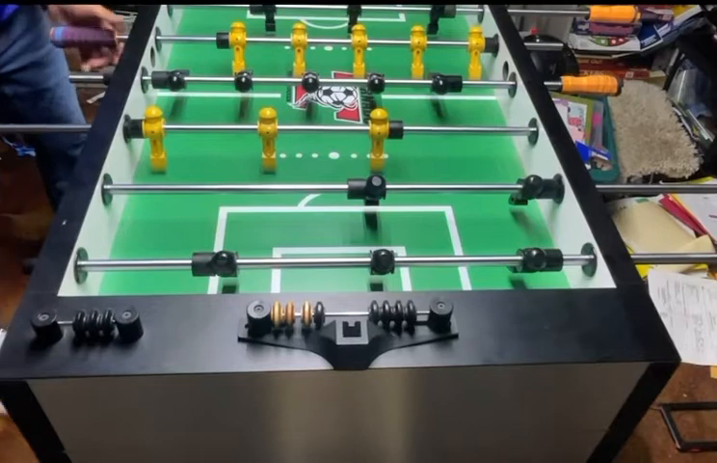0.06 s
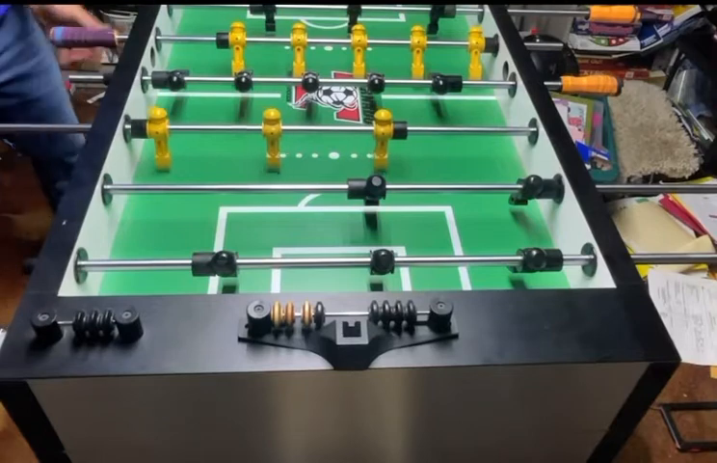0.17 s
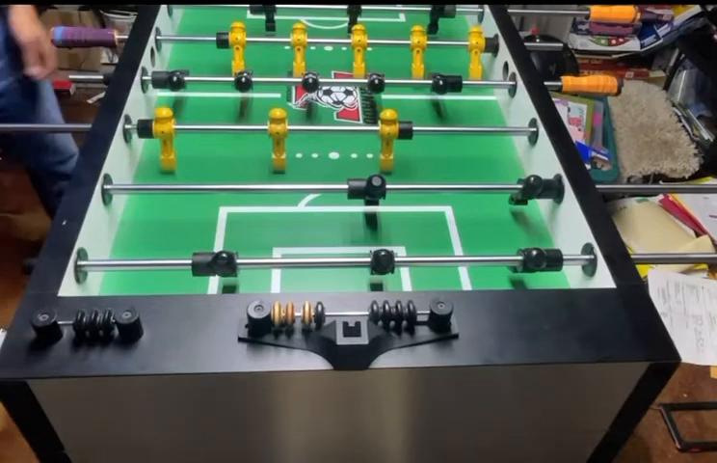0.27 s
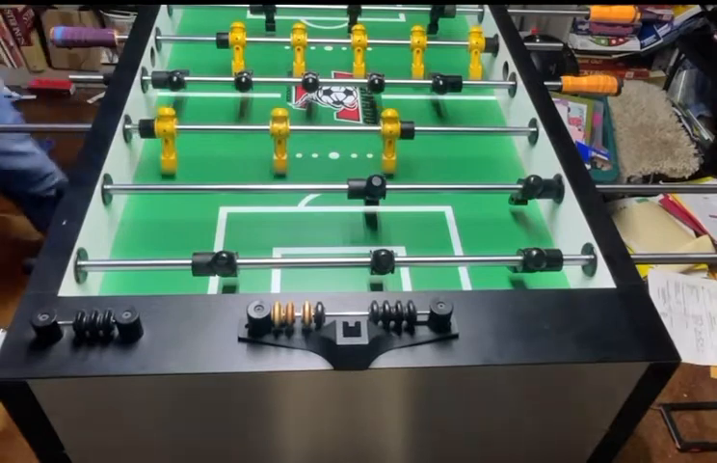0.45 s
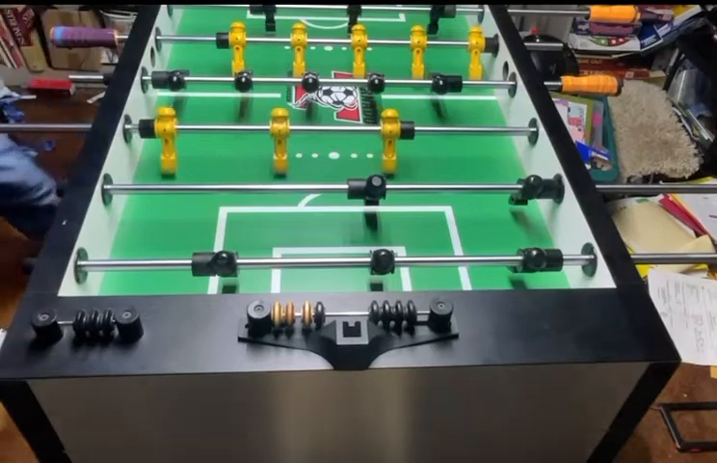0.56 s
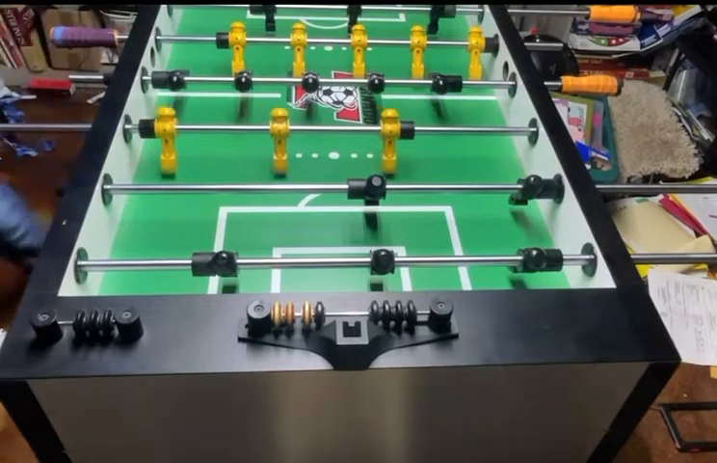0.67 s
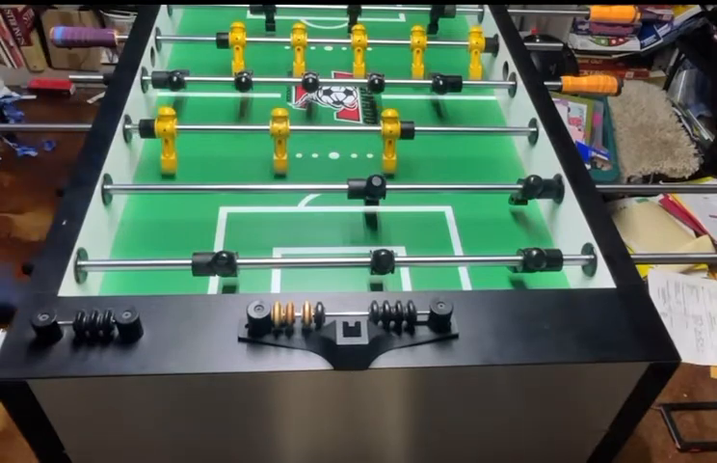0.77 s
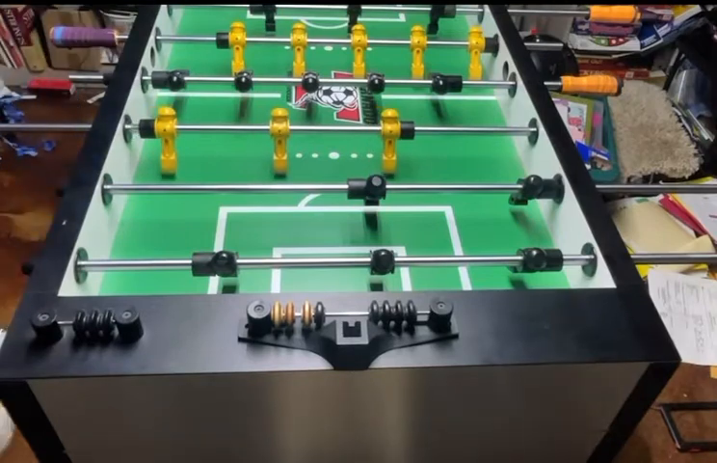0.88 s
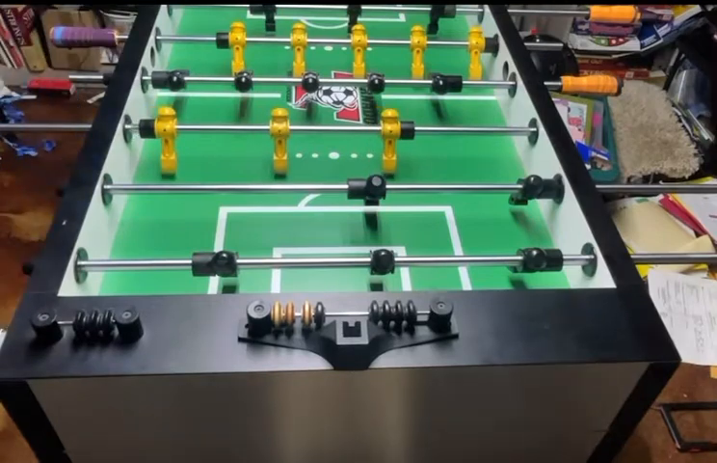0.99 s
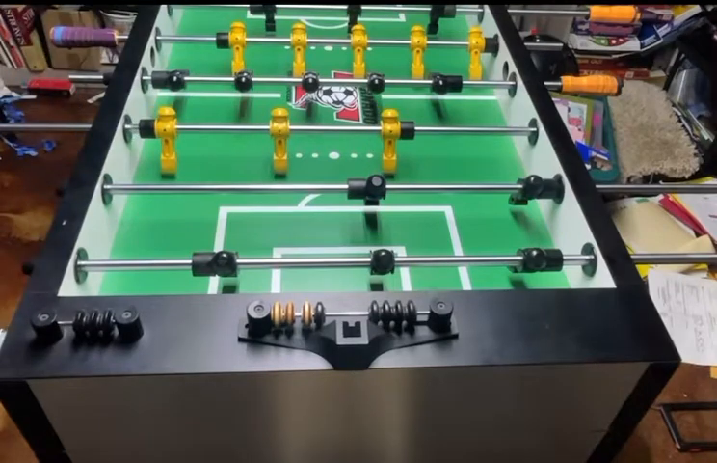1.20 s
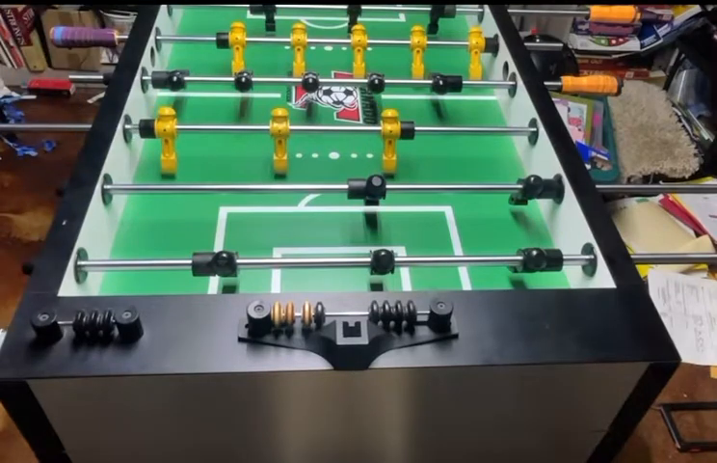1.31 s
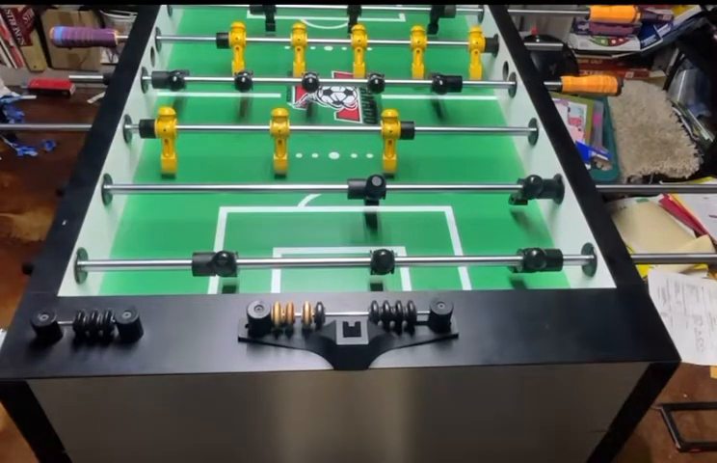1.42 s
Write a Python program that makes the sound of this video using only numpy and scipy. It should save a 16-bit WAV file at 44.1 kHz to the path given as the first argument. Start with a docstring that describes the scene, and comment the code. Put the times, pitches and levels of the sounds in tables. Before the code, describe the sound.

A foosball knocks sharply against the table's wooden wall, followed by duller rod knocks.

```python
"""A foosball is nudged and slammed into the table's wooden cabinet, in a small, cluttered room.
Each hit sends out a short pulse and sets the wood, the steel rods and a plastic figure ringing.
Duller knocks of rods and bumpers follow, and low thumps pass through the table as rods are shoved.
Underneath, the ball rumbles as it rolls, and the rods hiss and squeak faintly in their bearings."""
import sys
import numpy as np
from scipy import signal
from scipy.fft import rfft, irfft, next_fast_len
from scipy.io import wavfile
from scipy.ndimage import uniform_filter1d

SR = 44100
rng = np.random.default_rng(int(sys.argv[2]) if len(sys.argv) > 2 else 0)


def wav_out(sig):
    """Save sig, one row per channel (or a flat mono array), as 16-bit PCM at SR to the path in sys.argv[1]."""
    wavfile.write(sys.argv[1], SR, np.round(np.clip(np.atleast_2d(sig).T, -1, 1) * 32767).astype(np.int16))


N = 63945
TIME = np.arange(N) / SR

# Levels are relative. A mode is a tone at which a part rings; t60 is the time to fade by 60 dB.
# The hits, plus the rods' ring swelling back as an echo at 0.453 s:
# t/s, level/dB, contact cut-off f/Hz, bass/dB, plastic click/dB, wall ring/dB, rod ring/dB
EVENTS = [(0.1736, -25, 487, -23, -48.5, -62, -67), (0.1952, -25.5, 2030, -29.5, -56, -54, -46),
          (0.2075, -22, 1850, -10, -49, -60, -46), (0.2185, -25.5, 1470, -9, -31, -8.5, -49),
          (0.2265, -28, 1390, 4, -35, -24.5, -67), (0.4236, -24.5, 806, -24, -48.5, -36, -28.5),
          (0.4533, -36.5, 810, 1, -53, -52, -33.5), (0.507, -38.5, 1544, -3, -57.5, -54, -51.5),
          (0.584, -46.5, 1300, -18, -67, -66, -58), (0.6250, -30.5, 396, -17, -90, -74, -78),
          (0.6550, -39.5, 368, -8.5, -83, -57, -77), (0.9931, -48.5, 554, -11, -96, -54, -85),
          (1.0010, -41.5, 420, -18, -90, -64, -72), (1.0322, -33.5, 650, -16.5, -93, -35, -53.5),
          (1.1130, -53.5, 375, -3, -87, -44.5, -73)]
# Modes of each part: f/Hz, level/dB, t60/s (capped at LONGEST_RING_S)
WALL_MODES = [(331.3, -21, 0.15), (673, -19.5, .34), (698, -13.5, .42), (759.5, 0, .13), (767.6, -15, .48),
              (731, -18, 0.4), (825.5, -10, 0.12), (1003, -31.5, .33)]  # the cabinet wall that the ball strikes
PANEL_MODES = [(143, -14.5, 0.38), (172, -7, 0.22), (265.3, -12.5, 1), (337, -11, .35), (376.2, -11, 0.15),
               (406.4, -9, 0.17), (439.8, -6.5, 0.067), (559.7, -9, 0.16), (1130, -13.5, 0.086),
               (1199, -14.5, 0.083), (1470, -22, .25)]  # the cabinet's panels
ROD_MODES = [(817.6, -3, .25), (880, -7.5, 0.45), (901, -1.5, .18), (1565, -4, 0.094), (1527, -10, 0.43),
             (1638.3, -2, 0.32)]  # the steel rods
FIGURE_MODES = [(2310, -5.5, 0.45), (2753, -10, 0.073), (3686, -12, 0.66), (5146, -15.5, .18),
                (6406, -14, 0.18), (6835, -14.5, .15)]  # the plastic figure
# Tone colour of each noisy sound, per half octave: f/Hz, level/dB
WOOD_SPECTRUM = [(30, -31.5), (80, -40), (110, -25), (160, -9.5), (220, -6.5), (280, -1), (400, -1.5),
                 (560, 0), (800, 2.5), (1200, -5), (1700, -2.5), (2500, -3), (6000, -2)]  # the cabinet's crowded modes
CLICK_SPECTRUM = [(800, -18.5), (1500, -7.5), (2800, 0), (4500, -5), (7000, -2.5), (10000, -6.5),
                  (13000, -11.5), (16000, -21)]  # the plastic click
ROLL_SPECTRUM = [(30, -18.5), (60, -19.5), (150, -21.5), (270, -3.5), (400, -2), (750, -4), (1200, -14.5),
                 (2200, -27), (5000, -41), (14000, -58.5)]  # the rolling ball
SLIDE_SPECTRUM = [(300, -8), (1000, -6), (2000, -3), (3500, -4), (5500, 0.5), (9000, -9), (12000, -10),
                  (16000, -26)]  # the sliding rods
QUIET_SPECTRUM = [(30, -91.5), (90, -78.5), (140, -87), (220, -77), (450, -81), (1000, -89), (3000, -83),
                  (8000, -93), (15000, -108)]  # the quiet room
# Loudness over time: t/s, level/dB
ROLL_LEVEL = [(0, -50), (.12, -47), (.2, -53.5), (.4, -51), (.55, -66.5), (.62, -40), (.68, -48.5),
              (.8, -75), (1.45, -88.5)]  # the rolling ball
SLIDE_LEVEL = [(0, -72.5), (.11, -97), (.3, -63), (.6, -78), (.85, -96.5), (1.05, -82), (1.3, -77.5),
               (1.45, -80)]  # the sliding rods
# Shoves that sway the table: t/s, level/dB, swell time/s
THUMPS = [(0.03, -50.5, .07), (0.427, -58, 0.016), (0.506, -42, 0.028), (0.594, -45, 0.011),
          (0.664, -62, 0.053), (1.01, -61, .025), (1.138, -63.5, .03)]
# The whistle of a sliding rod: t/s, f/Hz, level/dB
SQUEAK = [(1.26, 9230, -100), (1.31, 9210, -75), (1.39, 8680, -76.5), (1.45, 8550, -83)]
# Echoes of the pulses from the room's side wall and ceiling: delay/s, level/dB
PULSE_ECHOES = [(.0058, 0.5), (0.03, -3.5)]
# Echoes of the ringing: left delay/s, left level/dB, right delay/s, right level/dB
RING_ECHOES = [(.009, -14, .0135, -10), (.029, -10, .037, -10.5)]
# How long sound lingers in the room: f/Hz, t60/s
ROOM_T60 = [(60, 0.18), (250, 0.46), (700, 0.44), (2000, .45), (6000, 0.29), (14000, .28)]
# How alike the noise is at both ears: f/Hz, correlation (1 = the same)
EAR_LIKENESS = [(60, 0.32), (250, 0.36), (500, 0.2), (1000, .2), (4000, 0.11), (12000, .1)]
# Which way the noise leans: f/Hz, left minus right level/dB
EAR_BALANCE = [(40, 0), (125, 5), (300, 2.5), (700, 7.5), (1200, 6), (2500, 4.5), (5000, 8.5),
               (12000, -1.5)]

CONTACT_SLOPE, BASS_HZ = 3.1, 218  # how steeply an event loses treble; where its bass ends
PULSE_DB, PULSE_LOW_HZ, PULSE_TOP_HZ = 1.5, 407, 1920
RING_LOW_HZ, RING_TOP_HZ, LONGEST_RING_S = 130, 2170, .5
PULSE_PAN_DB, WALL_PAN_DB, ROD_PAN_DB, FIGURE_PAN_DB, PANEL_PAN_DB = 3, 6, 7.5, 7, -1
WALL_LAG_S = 0.00024  # the wall's ring reaches the left ear first
WOOD_T60_S, CLICK_T60_S = 0.12, 0.075
CLICK_TOP_RATIO = 6.6  # click cut-off divided by contact cut-off
ATTACK_S, SWELL_CYCLES = .0015, 0.75  # rise of the noisy tails
WOOD_ROOM_DB, CLICK_ROOM_DB, ROOM_BUILD_S = -9, -8.5, 0.0088
THUMP_HZ, SQUEAK_WIDTH_HZ = 89, 160
MODE_LIFT_DB, MODE_WIDTH_HZ = 1.5, 24  # the strong modes stand out of the noise
RIPPLE_DB, RIPPLE_WIDTH_HZ, RIPPLE_FROM_HZ = 3, 60, 470  # unevenness of the small resonances
PEAK_LIMIT, CUTOFF_HZ = .9, 15700


def air_pulses():
    """Each event is one short pulse, wider when soft, which returns from wall and ceiling."""
    out = np.zeros(N)
    for s, db, contact_hz, *_ in EVENTS:
        pulse = butter_twice(signal.unit_impulse(SR // 50), contact_hz, "low")
        pulse = butter(pulse, PULSE_LOW_HZ, "high")
        start = int(s * SR)
        out[start:start + len(pulse)] += from_db(db + PULSE_DB) * pulse / np.abs(pulse).max()
    out = cut_bass(butter(out, PULSE_TOP_HZ, "low"))
    echoes = sum(from_db(db) * delayed(out, lag_s) for lag_s, db in PULSE_ECHOES)
    return pan(PULSE_PAN_DB) * (out + echoes)


def event_strength(hz):
    """Strength of every event at one frequency: soft ones have less treble, heavy ones more bass."""
    _, db, contact_hz, bass_db, *_ = np.transpose(EVENTS)
    strength = from_db(db + bass_db / (1 + (hz / BASS_HZ) ** 4))
    return strength / np.sqrt(1 + (hz / contact_hz) ** (2 * CONTACT_SLOPE))


def event_spikes(heights):
    """One single-sample spike at the moment of each event."""
    out = np.zeros(N) + 1e-18
    out[(np.array(EVENTS)[:, 0] * SR).astype(int)] += heights
    return out


def ringing_parts():
    """The cabinet's wall and panels, the rods and the figure ring with their own tones."""
    click_gain, wall_gain, rod_gain = from_db(np.transpose(EVENTS)[-3:])
    wall = ring(WALL_MODES, lambda hz: wall_gain)
    wall = pan(WALL_PAN_DB) * np.array([wall, delayed(wall, WALL_LAG_S)])
    panels = pan(PANEL_PAN_DB) * ring(PANEL_MODES, event_strength)
    rods = pan(ROD_PAN_DB) * ring(ROD_MODES, lambda hz: rod_gain)
    figure = pan(FIGURE_PAN_DB) * ring(FIGURE_MODES, lambda hz: click_gain)
    return cut_bass(butter_twice(wall + rods + panels, RING_TOP_HZ, "low")) + figure


def ring(modes, gains_at):
    """Every event starts a fading tone in each mode, as strongly as gains_at(hz) says."""
    out = 0
    for hz, db, t60 in modes:
        decay = from_db(-60 / (min(t60, LONGEST_RING_S) * SR))
        angle = 2 * np.pi * hz / SR
        spikes = event_spikes(from_db(db) * gains_at(hz))
        out += signal.lfilter([0, np.sin(angle)], [1, -2 * decay * np.cos(angle), decay ** 2], spikes)
    return out


def cut_bass(x):
    """Little of the ringing and the pulses sounds below about 130 Hz."""
    return butter_twice(x, RING_LOW_HZ, "high")


def with_echoes(x):
    """The ringing reaches each ear again from nearby surfaces."""
    return x + sum(np.array([from_db(left_db) * delayed(x[0], left_s),
                             from_db(right_db) * delayed(x[1], right_s)])
                   for left_s, left_db, right_s, right_db in RING_ECHOES)


def event_tails(hz):
    """Loudness in one band as wood and plastic die away after each event and linger in the room."""
    _, _, contact_hz, _, click_db, *_ = np.transpose(EVENTS)
    wood = event_spikes((event_strength(hz) * from_db(at_hz(WOOD_SPECTRUM, hz))) ** 2)
    dulling = 1 + (hz / (CLICK_TOP_RATIO * contact_hz)) ** 4
    click = event_spikes(from_db(click_db + at_hz(CLICK_SPECTRUM, hz)) ** 2 / dulling)
    into_room = from_db(WOOD_ROOM_DB) ** 2 * wood + from_db(CLICK_ROOM_DB) ** 2 * click
    room = smooth(fading(into_room, at_hz(ROOM_T60, hz)), ROOM_BUILD_S)
    level = np.sqrt(fading(wood, WOOD_T60_S) + fading(click, CLICK_T60_S) + room)
    swell_s = SWELL_CYCLES / hz
    return smooth(smooth(level, swell_s), ATTACK_S + swell_s)


def table_thumps():
    """The whole table sways in its lowest mode as the rods are shoved."""
    out = 0
    for s, db, swell_s in THUMPS:
        age = np.maximum(TIME - s, 0)
        swell = (age / swell_s * np.exp(1 - age / swell_s)) ** 2
        out = out + from_db(db) * swell * np.sin(2 * np.pi * THUMP_HZ * age)
    return pan(db=3) * out


def rolling_ball(hz):
    """Loudness in one band of the ball rumbling over the playfield."""
    return from_db(over_time(ROLL_LEVEL) + at_hz(ROLL_SPECTRUM, hz))


def sliding_rods(hz):
    """Loudness in one band of the rods hissing in their bearings."""
    return from_db(over_time(SLIDE_LEVEL) + at_hz(SLIDE_SPECTRUM, hz))


def rod_squeak():
    """A thin, rough whistle from a bearing sinks in pitch as the rod slows."""
    s, hz, db = np.transpose(SQUEAK)
    rough = butter(rng.standard_normal((2, N)), SQUEAK_WIDTH_HZ, "low")
    tone = np.sin(2 * np.pi * np.cumsum(np.interp(TIME, s, hz)) / SR)
    level = (TIME > s[0]) * from_db(np.interp(TIME, s, db))
    return pan(ROD_PAN_DB) * level * tone * rough / rough.std()


def noisy_sounds():
    """The energies of the tails, ball, rods and quiet room add up, band by band."""
    out = 0
    for hz, noise in noise_bands():
        quiet_room = from_db(at_hz(QUIET_SPECTRUM, hz))
        energy = event_tails(hz) ** 2 + rolling_ball(hz) ** 2 + sliding_rods(hz) ** 2 + quiet_room ** 2
        out = out + noise * np.sqrt(energy)
    return out


def table_noise():
    """Two pairs of noises coloured by the table's strong modes and countless small resonances."""
    size = next_fast_len(N + SR // 2)
    hz = np.fft.rfftfreq(size, 1 / SR)
    modes = WALL_MODES + PANEL_MODES + ROD_MODES
    peaks = sum(1 / (1 + ((hz - mode_hz) / MODE_WIDTH_HZ) ** 2) for mode_hz, *_ in modes)
    lift = np.sqrt(1 + from_db(MODE_LIFT_DB) ** 2 * peaks)
    ripple = np.interp(hz / RIPPLE_WIDTH_HZ, np.arange(SR // 20), rng.standard_normal(SR // 20))
    ripple *= hz ** 2 / (hz ** 2 + RIPPLE_FROM_HZ ** 2)
    white = rfft(rng.standard_normal((2, 2, size)))
    return irfft(white * lift * from_db(RIPPLE_DB * ripple), size)


def noise_bands():
    """Steady stereo noise in half-octave bands, mostly leaning left: gives (centre f/Hz, noise)."""
    edges = 24 * 2 ** (np.arange(20) / 2)
    pairs = table_noise()
    for k, (low, high) in enumerate(zip(edges, edges[1:])):
        hz = np.sqrt(low * high)
        band = butter(pairs[k % 2], [low, high], "band")
        band = butter(band, [low / np.sqrt(2), min(high * np.sqrt(2), SR / 2 - 1)], "band")[:, -N:]
        power = uniform_filter1d(band * band, size=int(2 * SR / (high - low)) + 200)
        shared, opposed = band / np.sqrt(power + 1e-20)  # even out the loudness
        alike = np.clip(at_hz(EAR_LIKENESS, hz), -1, 1)
        stereo = np.sqrt(1 + alike) * shared + np.sqrt(1 - alike) * opposed * [[1], [-1]]
        yield hz, pan(at_hz(EAR_BALANCE, hz)) * stereo / np.sqrt(2)


def from_db(db):
    """Turn decibels into a gain."""
    return 10 ** (np.asarray(db) / 20)


def at_hz(points, hz):
    """Read a table at one frequency, with octaves evenly spaced."""
    f, value = np.transpose(points)
    return np.interp(np.log(hz), np.log(f), value)


def over_time(points):
    """Read a level curve at every sample."""
    return np.interp(TIME, *np.transpose(points))


def pan(db):
    """Left and right gains, with the left louder by db."""
    return from_db(np.array([[db], [-db]]) / 2)


def butter(x, hz, kind):
    """A gentle filter that keeps the lows, the highs or a band."""
    return signal.sosfilt(signal.butter(2, hz, kind, fs=SR, output="sos"), x)


def butter_twice(x, hz, kind):
    """Filter twice for a steeper cut."""
    return butter(butter(x, hz, kind), hz, kind)


def delayed(x, lag_s):
    """The same sound a little later."""
    return np.interp(TIME - lag_s, TIME, x, left=0)


def fading(energy, t60):
    """Sound energy dies away by 60 dB in t60 seconds."""
    return signal.lfilter([1], [1, -from_db(-120 / (t60 * SR))], energy)


def smooth(x, seconds):
    """Soften sudden changes."""
    decay = np.exp(-1 / (seconds * SR))
    return signal.lfilter([1 - decay], [1, -decay], x)


def scene():
    """Everything the table does, heard from its end."""
    return air_pulses() + with_echoes(ringing_parts()) + table_thumps() + rod_squeak() + noisy_sounds()


def record(dry):
    """The highest peaks are rounded and the very top of the treble is cut steeply."""
    rounded = dry / (1 + (dry / PEAK_LIMIT) ** 6) ** (1 / 6)
    return signal.sosfilt(signal.cheby2(12, 70, CUTOFF_HZ, fs=SR, output="sos"), rounded)


dry = scene()
out = record(dry)
wav_out(out)
```